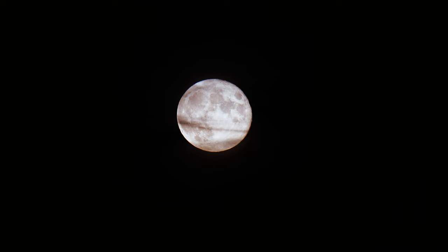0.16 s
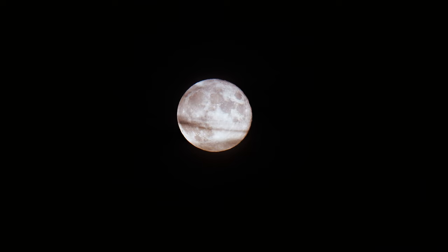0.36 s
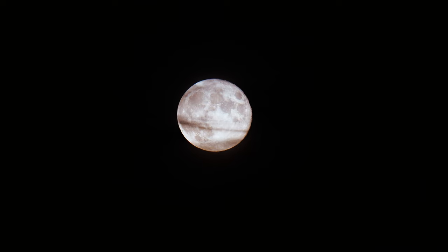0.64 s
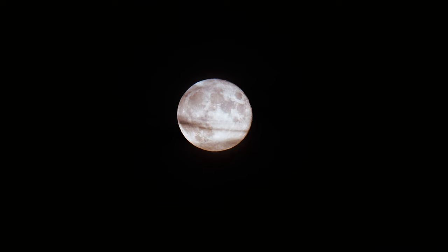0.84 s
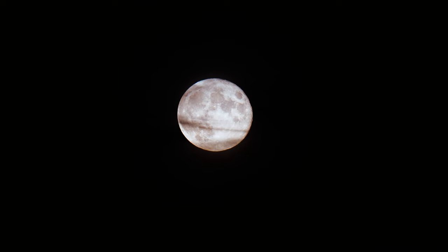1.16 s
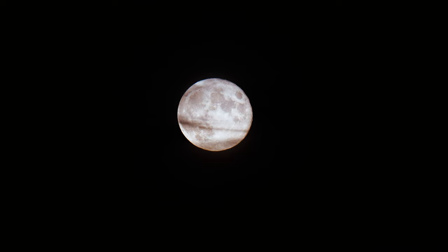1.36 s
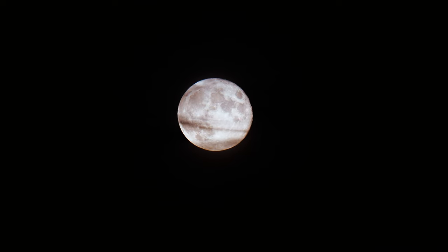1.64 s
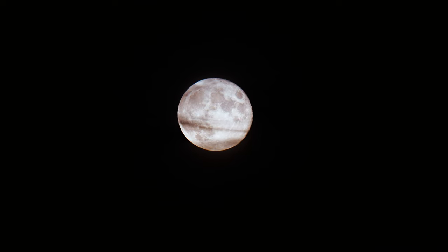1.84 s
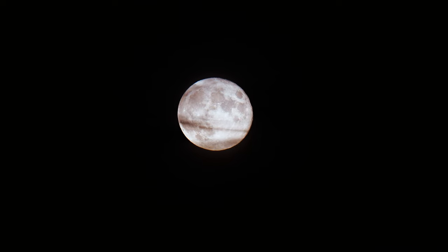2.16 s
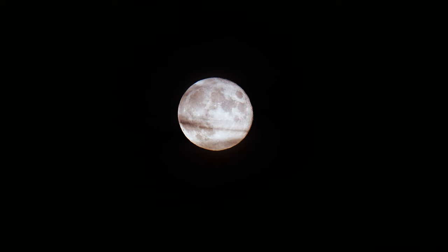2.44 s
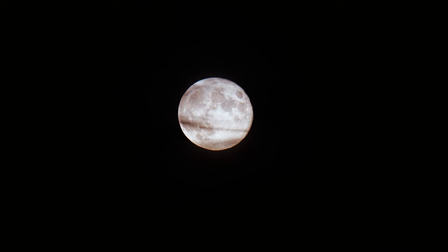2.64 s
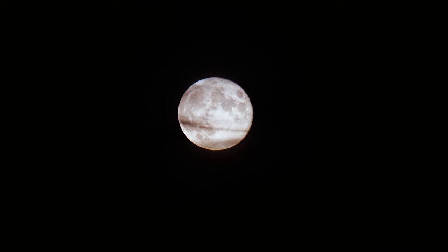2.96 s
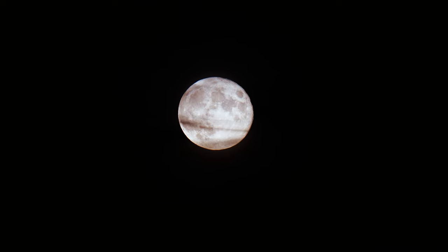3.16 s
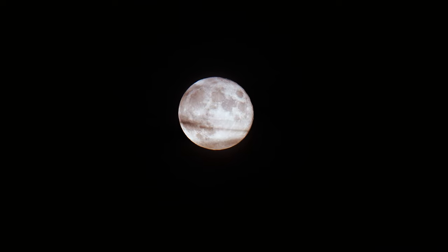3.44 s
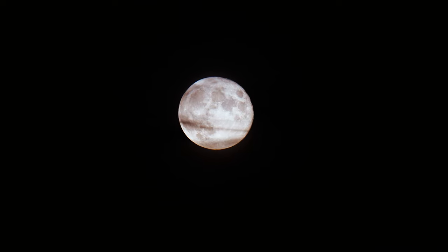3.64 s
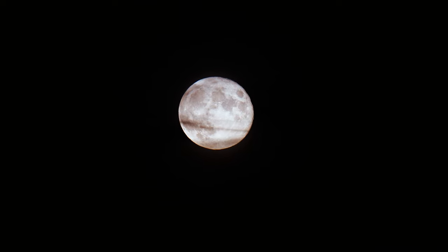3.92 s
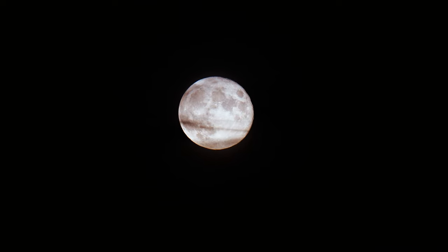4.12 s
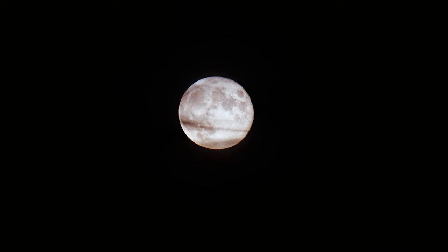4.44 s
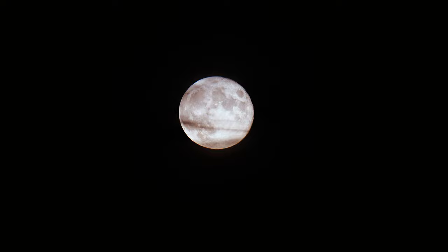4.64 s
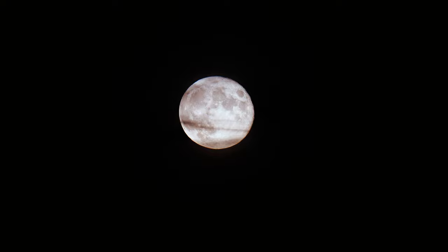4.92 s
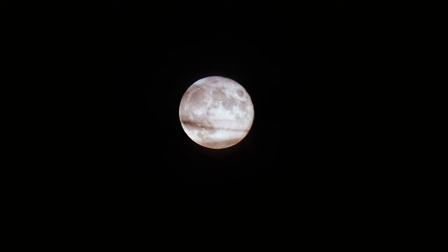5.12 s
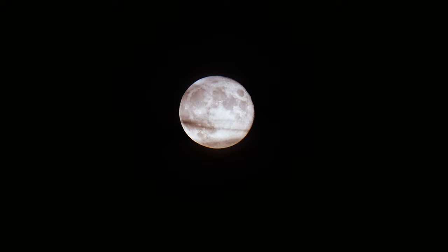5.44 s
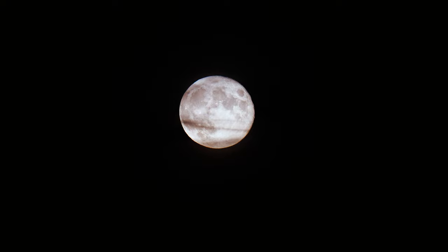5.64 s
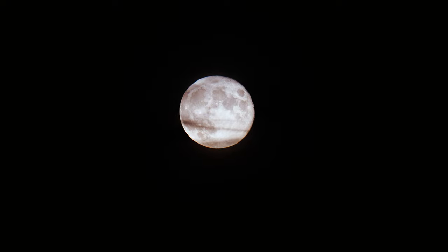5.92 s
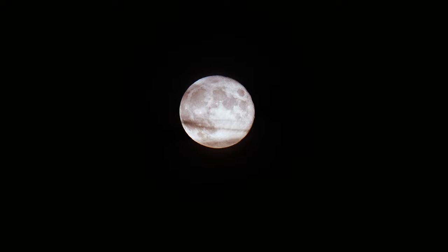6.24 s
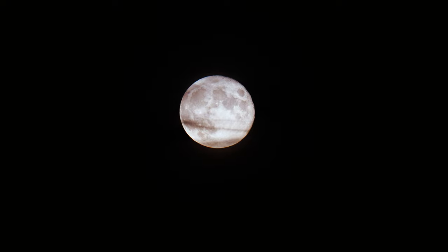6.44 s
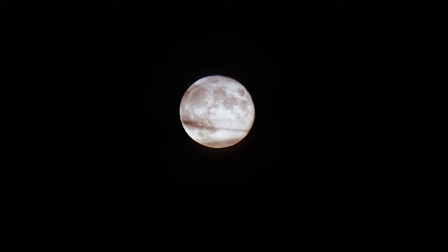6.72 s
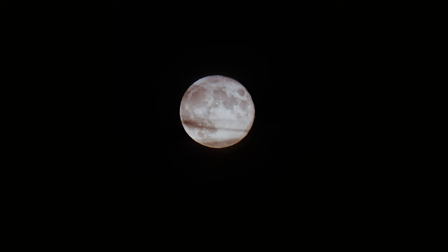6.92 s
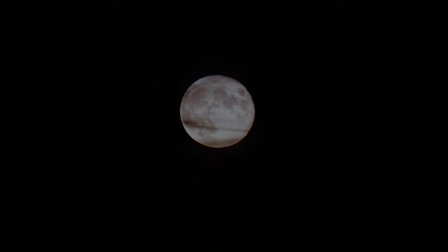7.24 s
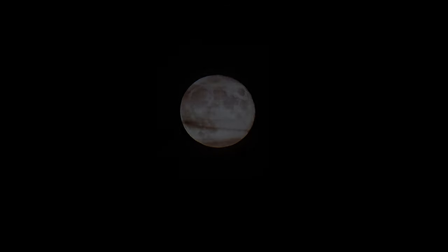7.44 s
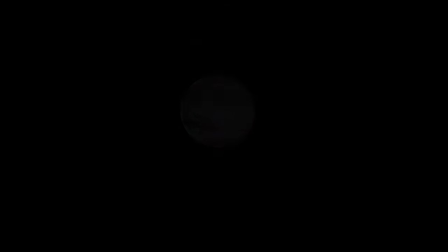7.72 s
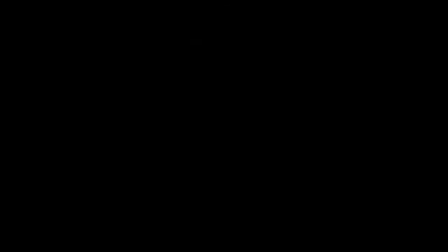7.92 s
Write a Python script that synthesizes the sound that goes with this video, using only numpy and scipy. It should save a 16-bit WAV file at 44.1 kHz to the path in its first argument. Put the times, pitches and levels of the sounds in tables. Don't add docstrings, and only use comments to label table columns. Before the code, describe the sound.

Two single mellow owl hoots in a quiet night wood, two rapid buzzy churring trills, faint thin whistles and cricket chirps over low hiss.

```python
import sys
import numpy as np
from scipy import signal
from scipy.fft import rfft, irfft, next_fast_len
from scipy.io import wavfile
from scipy.ndimage import uniform_filter1d

SR = 44100
rng = np.random.default_rng(int(sys.argv[2]) if len(sys.argv) > 2 else 0)


def decibels_to_gain(level_db):
    exponent = np.asarray(level_db, float) / 20
    return 10 ** exponent


def to_wav(sig):
    pcm = np.clip(np.atleast_2d(sig), -1, 1) * 32767
    pcm = np.round(pcm).astype(np.int16)
    wavfile.write(sys.argv[1], SR, pcm.T)


N = 356151


def unit(x):
    return x / np.sqrt(np.mean(x ** 2))


def curves(table):
    s, *columns = np.transpose(table)
    t = np.arange(N) / SR
    gate = np.clip(np.minimum(t - s[0] + .0005, s[-1] - t) / 0.0042, 0, 1)
    return [np.interp(t, s, c) for c in columns] + [gate]


def colour(x, points):
    size = next_fast_len(len(x))
    hz, db = np.transpose(points)
    bins_hz = np.maximum(np.arange(size // 2 + 1) * SR / size, 1)
    gain = decibels_to_gain(np.interp(np.log(bins_hz), np.log(hz), db))
    return irfft(rfft(x, size) * gain, size)[:len(x)]


def walk(rate_hz):
    k = int(SR / rate_hz)
    held = np.repeat(rng.standard_normal(N // k + 1), k)
    return unit(uniform_filter1d(uniform_filter1d(held, k), k)[:N])


def trees(x, delay_s, t60_s, treble_db):
    t = np.arange(SR) / SR
    tail = rng.standard_normal(SR) * (1 - np.exp(-t / delay_s)) * decibels_to_gain(-60 * t / t60_s)
    tail = colour(tail / np.sqrt(np.sum(tail ** 2)), [(2500, 0.026), (8000, treble_db)])
    return signal.fftconvolve(x, tail)[:N]


# (start [s], pitch factor, level [dB])
HOOTS = [
    (-.128, 1, 0.),
    (3.19, 1., 0.),
]
# (time after start [s], pitch [Hz], level [dB])
HOOT = [
    (0, 305, -42.5),
    (.03, 391.7, -16.5),
    (.06, 424.2, -11),
    (.122, 444.7, -9),
    (0.229, 433.8, -12),
    (0.31, 407.6, -18),
    (.354, 364, -27),
    (.374, 321.5, -36),
    (0.397, 272, -55.5),
]
# (multiple, level [dB])
OVERTONES = [(2, -38), (3, -35), (4, -44), (5, -54), (6, -62), (7, -51), (8, -55), (9, -54), (10, -60),
             (11, -69), (12, -75), (13, -75), (14, -74), (15, -76), (16, -76)]
# (centre [Hz], width [Hz], lift held [dB], extra lift as pitch sinks and beak opens [dB])
BEAK = [(780, 100, 0, 7), (1180, 170, 0, 8), (4650, 250, 0, 9), (5330, 280, 0, 22), (6230, 90, 13, 0),
        (6850, 100, 0, 10)]


def owl():
    out = np.zeros(N)
    for start_s, pitch, level_db in HOOTS:
        hz, db, gate = curves(np.array(HOOT) * [1, pitch, 1] + [start_s, 0, level_db])
        hz, db = uniform_filter1d(hz, 600), uniform_filter1d(db, 250)
        phase = 2 * np.pi * np.cumsum(hz) / SR + 0.46
        out += gate * np.sqrt(2) * decibels_to_gain(db) * np.sin(phase)
        opening = np.clip(-np.gradient(hz) * SR / 300, 0, 1)
        fall_db = .47 * (db + 9)
        for k, k_db in OVERTONES:
            lift_db = sum((held + opening * more) * np.exp(-((k * hz - centre) / width) ** 2)
                          for centre, width, held, more in BEAK)
            overtone_db = -9 + fall_db + k_db + lift_db + walk(12)
            out += gate * np.sqrt(2) * decibels_to_gain(overtone_db) * np.sin(k * phase)
        air = unit(colour(rng.standard_normal(N), [(50, -8.5), (300, 6.0), (700, -30.5)]))
        out += gate * decibels_to_gain(db - 53.0) * air
    late = np.pad(out, (int(.15 * SR), 0))[:N]
    late = colour(late, [(340, -30), (430, 0), (600, 0), (2000, -10)])
    return out + decibels_to_gain(-27.0) * trees(late, .05, .22, -20.5)


# (frequency [Hz], density [dB per Hz])
HISS = [(41, -60.5), (70, -35.5), (125, -38), (203, -20), (227, -16.5), (278, -6), (349, -0.5), (437, 2.5),
        (600, -1), (672, -3), (2230, -21), (4010, -27), (7210, -39.5), (15600, -37)]


def distant_hiss():
    hiss, swell = 0, walk(0.93)
    octaves = np.linspace(-.99, .99, 21)
    overlap_db = 20 * np.log10(np.cos(np.pi / 2 * octaves))
    for hz in 60 * 2. ** np.arange(9):
        band = colour(rng.standard_normal(N), np.transpose([hz * 2 ** octaves, overlap_db]))
        hiss = hiss + band * decibels_to_gain(.3 * swell + .5 * walk(5))
    return decibels_to_gain(-44.5) * unit(colour(hiss, HISS))


def mains_hum():
    hum_hz, hum_db = 50.2, -73.5
    return np.sqrt(2) * decibels_to_gain(hum_db) * np.sin(2 * np.pi * hum_hz * np.arange(N) / SR)


# (first strong beat [s], last strong beat [s], shortfall of every second beat [dB])
LIMPS = [
    (1.0806, 1.0806, 4.5),
    (1.2064, 1.4593, 6),
    (2.0123, 2.1655, 7),
    (2.2428, 2.3196, 8),
    (6.1127, 6.1127, 6),
    (6.2204, 6.2564, 8),
    (6.3287, 6.3287, 8),
    (6.3467, 6.4903, 5),
    (7.1392, 7.2565, 3),
]


def limp(beats, short_db):
    ordinary, short_db = np.ones(600), short_db.copy()
    for first_s, last_s, db in LIMPS:
        a, b = int(first_s * SR), int(last_s * SR)
        ordinary[int(beats[a]):int(beats[b]) + 1:2] = 0
        short_db[a - SR // 40:b + SR // 30] = db
    return ordinary, short_db


# (centre [Hz], width [Hz], level [dB])
CHURR_MODES = [(1690, 75, -9), (1867, 99, -1.5), (2087, 190, -2), (2260, 110, -2.5), (2398, 170, -5),
               (2580, 250, -6.5), (2910, 760, -19), (3345, 200, -15), (3772, 270, -13), (4250, 330, -25.5),
               (5030, 480, -27.5), (6000, 600, -21), (6500, 950, -28), (7260, 570, -22), (7780, 500, -20.5),
               (8720, 120, -27), (9440, 460, -33)]


def body_rattle(beats, shape, tuning):
    habit = rng.standard_normal(800)[(beats % 1 * 800).astype(int)]
    fresh = rng.standard_normal(N) * decibels_to_gain(1.3 * rng.standard_normal(N))
    clicks = (1.1 + shape) * (0.37 * habit + fresh)
    hz = np.arange(20, 16000, 20.)
    body = sum(decibels_to_gain(2 * db) / (1 + (2 * (hz - centre * tuning) / width) ** 4)
               for centre, width, db in CHURR_MODES)
    return colour(clicks, np.transpose([hz, 10 * np.log10(body)]))


# (full voice [s], end [s], level [dB], swell [dB per s squared])
CHURRS = [
    (1.76, 2.35, -34.5, 12.5),
    (6.677, 7.305, -34.5, 17),
    (4.1, 4.27, -50, 5),
]
# (fresh rate [beats per s], slowing by the end [beats per s], tiring time [s], one beat [s])
BEATS = [(56.58, 6.07, .633, 1.4593), (56.23, 6.7, .432, 6.4544), (56.5, 3, .5, 4.)]
# (middle [dB], treble [dB], treble lost per dB of swell [dB], ridge at full voice [dB])
COLOURS = [(-14.5, -12, 1.15, 2), (-13.5, -14, 4, 2.5), (-10.5, -32.5, -1, -0.8)]
UNEVEN = [.03, .03, .12]
SWAY = [.3, .3, 1.6]
BRIGHT_LOSS = [.6, 1.1, 1.]


def churr(call, effort_db, wet_db, t60_s, tuning, low_db, chirp_db):
    t = np.arange(N) / SR
    voiced_s, end_s, level_db, swell = CHURRS[call]
    rate, slowing, tiring_s, beat_s = BEATS[call]
    middle_db, treble_db, treble_loss, ridge_db = COLOURS[call]

    lack_db = swell * np.maximum(voiced_s - t, 0) ** 2
    tired = np.exp(np.minimum(t - end_s, 0) / tiring_s)
    db = level_db - lack_db - tired - 499.5 * np.maximum(t - end_s, 0)

    beats = np.cumsum(rate - slowing * tired) / SR
    beats += 1.45 - beats[int(beat_s * SR)] % 1
    beat = beats.astype(int)
    late_chance, effort_chance = rng.standard_normal((600, 2)).T
    ordinary, short_db = limp(beats, np.where(lack_db > .5, 4, 0.5))
    place = np.clip((beats % 1 - .17 - UNEVEN[call] * late_chance[beat]) / .62, 0, 1)
    shape = np.sin(np.pi * place ** 1.22) ** 2
    drive = np.clip((uniform_filter1d(db, 4000) + effort_db + 54.5) / 19, 0, 1)
    effort = drive - .055 * short_db * (ordinary[beat] - .25) + .04 * effort_chance[beat]

    start_hz = 1700 * tuning - 13 * np.minimum(lack_db, 12)
    rise_hz = 200 + 850 * np.clip(effort, 0, 1) ** 1.7
    phase = 2 * np.pi * np.cumsum(start_hz + rise_hz * place ** 0.97) / SR
    chirp = sum(decibels_to_gain(k_db + 3 * k * effort) * np.sin(k * phase)
                for k, k_db in enumerate([-1, -7.5, -29, -34], start=1))

    rattle = body_rattle(beats, shape, tuning)
    lowest, under, deep, dull, full = (colour(rattle, [(edge_hz * .97, 0), (edge_hz * 1.05, -40)])
                                       for edge_hz in (1900, 2450, 2950, 3550, 5400))
    low_gain = decibels_to_gain(low_db + 2 * tired + 9.8 * (1 - drive))
    ridge_gain = decibels_to_gain(ridge_db * drive - 6.9 * (1 - drive))
    low = deep + (low_gain - 1) * lowest + (ridge_gain - 1) * (deep - under)
    middle = dull - deep + decibels_to_gain(-BRIGHT_LOSS[call] * lack_db) * (full - dull)
    treble = unit((rattle - full) * (1.4 + shape))
    middle_db = middle_db - 5 * tired
    treble_db = treble_db - 4 * tired - treble_loss * lack_db
    upper = decibels_to_gain(middle_db + 4.5) * middle / np.std(full - lowest) * 3.1
    upper = upper + decibels_to_gain(treble_db - 1.5 - 8 * (drive - effort)) * treble
    dry = decibels_to_gain(db) * (unit(low) + upper + decibels_to_gain(chirp_db + 6.7 * (1 - drive)) * shape * chirp)

    sway = SWAY[call] * walk(5)
    wet = sum(trees(dry * part, 0.00066, t60_s, -9.0) for part in (np.cos(sway), np.sin(sway)))
    return decibels_to_gain(0.5) * (dry + decibels_to_gain(wet_db) * wet) / np.sqrt(1 + decibels_to_gain(2 * wet_db))


# (time [s], pitch [Hz], level [dB])
WHISTLES = [
    [(4.5, 3980, -64), (4.53, 4020, -62), (4.57, 3720, -65), (4.61, 3700, -68)],
    [(4.68, 3900, -72), (4.72, 4250, -66), (4.755, 4640, -63), (4.82, 4680, -68)],
]


def bird():
    out = np.zeros(N)
    for note in WHISTLES:
        hz, db, gate = curves(note)
        tone = np.sqrt(2) * np.sin(2 * np.pi * np.cumsum(hz) / SR)
        out += gate * decibels_to_gain(db + 2 * walk(43.4)) * tone
    return out + decibels_to_gain(-14) * trees(out, 0.0088, 0.26, -3)


# (start [s], length [s], level [dB])
CRICKET = [
    (4.87, .12, -70),
    (5.1, .09, -69.5),
    (5.3, .12, -69),
    (5.51, .11, -69),
    (5.71, .08, -68.5),
    (5.87, .08, -70),
]


def cricket():
    t = np.arange(N) / SR
    chirps = sum(decibels_to_gain(db) * np.sin(np.pi * np.clip((t - start_s) / length_s, 0, 1)) ** .5
                 for start_s, length_s, db in CRICKET)
    throb = .6 + .4 * np.sin(2 * np.pi * 30 * t)
    note_hz = 4030 * (1 + 0.0087 * walk(80))
    note = np.sin(2 * np.pi * np.cumsum(note_hz) / SR)
    return 2 * chirps * throb * decibels_to_gain(1.2 * walk(30)) * note


# (time [s], peak level [dB])
TICKS = [
    (6.2575, -43),
    (7.2975, -45),
]


def ticks():
    out = np.zeros(N)
    for s, db in TICKS:
        start = int(s * SR)
        out[start:] += decibels_to_gain(db) * np.exp(-np.arange(N - start) / 12)
    return out


def scene():
    near = churr(0, effort_db=-1.2, wet_db=1.4, t60_s=0.18, tuning=1.0, low_db=1.1, chirp_db=-2.4)
    near = near + churr(1, effort_db=0., wet_db=1.4, t60_s=0.21, tuning=1.002, low_db=-1.0, chirp_db=-2.4)
    far = churr(2, effort_db=6.3, wet_db=9.1, t60_s=0.12, tuning=1.06, low_db=-2.5, chirp_db=-11.0)
    floor = distant_hiss() + mains_hum() + ticks()
    return (owl() + near + far + bird() + cricket() + floor)[None]


# (time [s], level [dB])
FADER = [
    (0, 1),
    (7.5, 0.5),
    (7.75, -1),
    (7.95, -4.5),
    (8.08, -5),
]


def fade(x):
    return x * decibels_to_gain(curves(FADER)[0])


def low_pass(x):
    return signal.sosfilt(signal.butter(12, 15710, fs=SR, output="sos"), x)


def record(dry):
    mix = fade(dry)
    return low_pass(mix)


dry = scene()
out = record(dry)
to_wav(out)
```